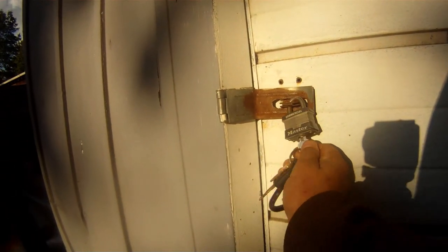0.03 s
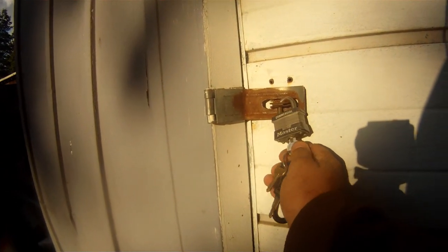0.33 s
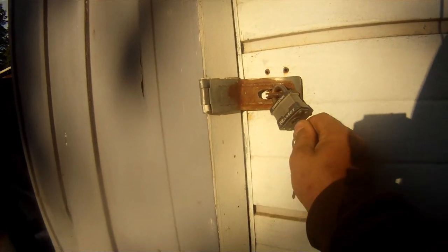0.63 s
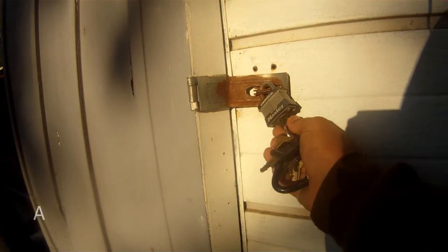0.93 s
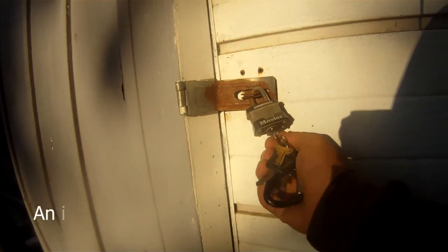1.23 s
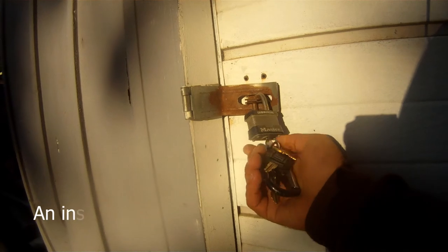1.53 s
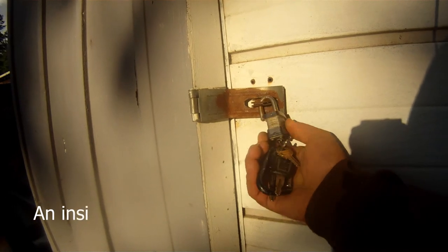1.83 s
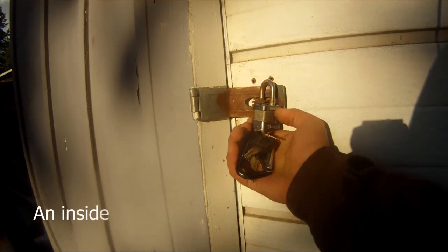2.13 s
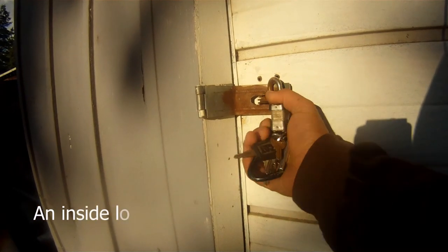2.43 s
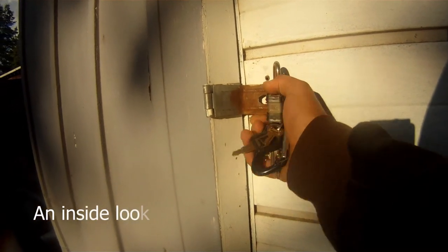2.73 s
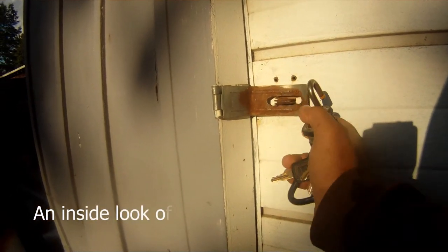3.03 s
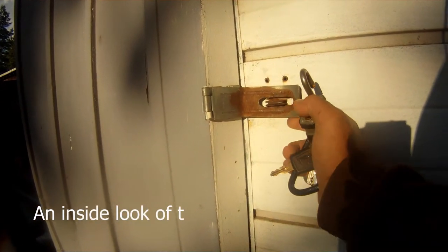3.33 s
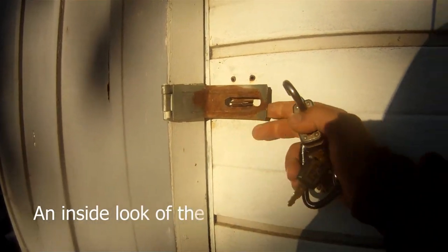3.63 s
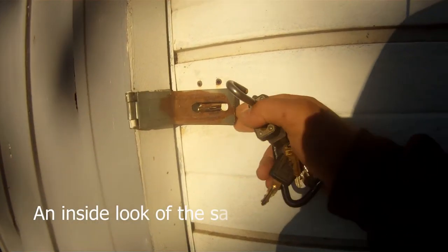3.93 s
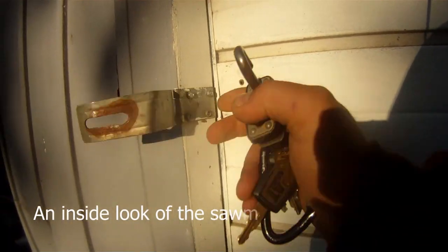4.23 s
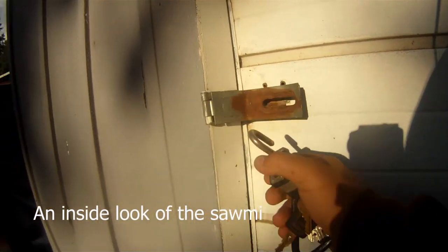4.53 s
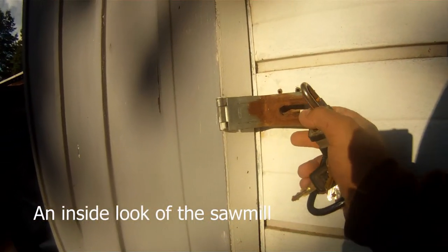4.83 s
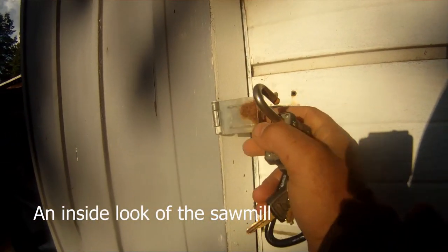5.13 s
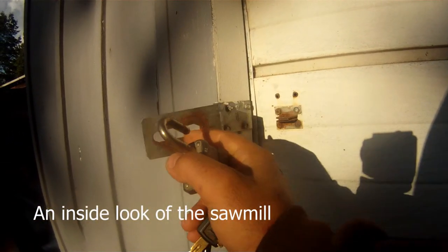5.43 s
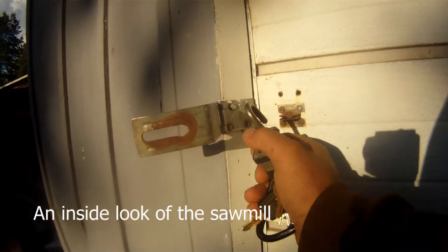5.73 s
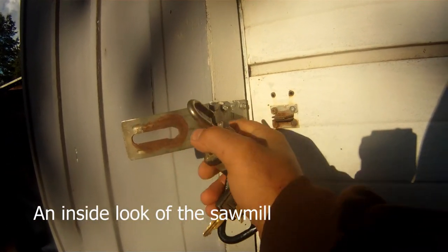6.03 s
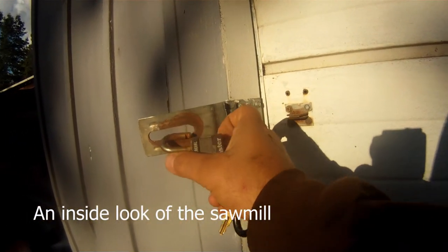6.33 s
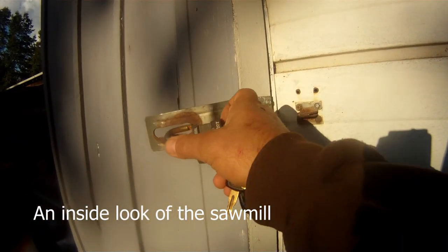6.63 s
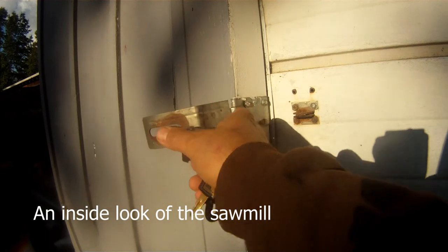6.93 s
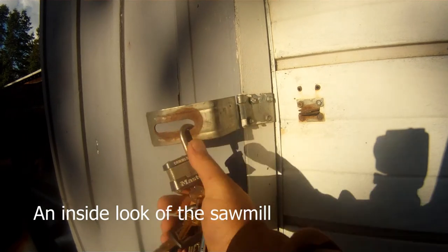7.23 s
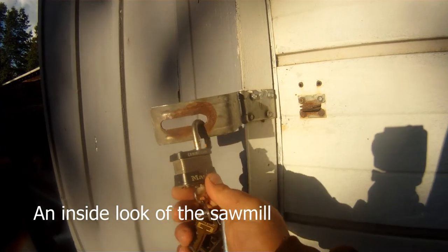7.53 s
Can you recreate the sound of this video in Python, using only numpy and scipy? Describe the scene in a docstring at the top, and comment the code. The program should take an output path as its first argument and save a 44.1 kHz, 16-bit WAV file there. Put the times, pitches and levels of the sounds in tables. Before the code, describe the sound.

Close by, outdoors, keys click lightly as a padlock is tugged and bumped on a shed door, each knock leaving a hollow thud and a metallic ring. Steel scrapes as the lock comes off. The hasp then bangs loudly, squeaks once and bangs again, before the lock's loop clinks softly against it. A faint low rumble from the handheld, nearly mono microphone runs underneath.

```python
"""Over a faint low rumble, a padlock knocks on a hollow shed door. Keys tick, the lock is opened and
lifted off, and its hasp (the hinged steel flap) swings open, shut with one squeak, and open again.
Each knock thuds in the door: its force sets the long boom after it, its hardness the sharp crack
and the wash of ringing metal. Sliding steel scrapes, and near the end the lock's loop clinks.
The shaken door also rumbles in the housing of a camera that hears almost in mono."""
import sys
import numpy as np
from scipy import signal
from scipy.fft import rfft, irfft
from scipy.io import wavfile
from scipy.ndimage import uniform_filter1d

SR = 44100
rng = np.random.default_rng(int(sys.argv[2]) if len(sys.argv) > 2 else 0)


def materialize(psi):
    """Save the field psi as 16-bit PCM at rate SR to the path in sys.argv[1].

    A 1-D psi becomes a single channel; in a 2-D psi each row is a channel.
    """
    bounded = np.clip(np.atleast_2d(psi).T, -1, 1)
    quanta = np.round(bounded * 32767).astype(np.int16)
    wavfile.write(sys.argv[1], SR, quanta)


N = 338247
TIME, FREQS = np.arange(N) / SR, np.fft.rfftfreq(N, 1 / SR)

# Levels are relative. A ring time (t60) is how long a sound takes to fade by 60 dB.
# a hand holding the camera: (time [s], level [dB])
HANDLING = [(0.0, -43.5), (0.38, -44), (2.14, -43.5), (2.58, -38.5), (3.35, -47.5), (3.84, -31.5),
            (4.12, -38), (4.87, -36), (5.94, -46), (7.67, -45)]
# lock and hasp hit the door; hardness is how strong the crack is next to the thud:
# (time [s], thud pitch [Hz], force [dB], hardness [dB])
DOOR_KNOCKS = [(0.166, 398, -13, -18), (0.207, 460, -12, -17), (0.637, 440, -22.5, -18),
               (0.655, 171, -25, -30), (0.849, 365, -19, -14), (0.92, 403, -23.5, -10),
               (1.15, 438, -16, -17.5), (1.332, 415, -12.5, -0.5), (1.359, 370, -12, -24),
               (1.411, 199, -39, -28), (2.2921, 398, -4.5, -2.5), (2.4587, 296, -8, -16.5),
               (2.739, 350, -14.5, -19.5), (2.834, 340, -16.5, -35), (3.33, 330, -31, -22),
               (3.505, 430, -13, -16.5), (3.547, 443, -18.5, -16), (3.638, 385, -7.5, -6),
               (3.732, 154, -23.5, -6), (3.806, 191, -16, -25), (4.262, 432, -21, -14.5),
               (4.312, 435, -14.5, -13), (4.329, 335, 2, -16), (4.364, 390, -8.5, -12),
               (4.376, 175, -20, -11), (4.426, 272, -7.5, -10.5), (4.454, 432, 1, 0), (4.709, 430, 1, -8),
               (4.717, 368, -12.5, -4), (4.846, 282, -15.5, -32), (4.9, 474, -17.5, -18),
               (5.065, 543, -22, -38), (5.549, 473, -39, -16), (6.631, 305, -25.5, -11),
               (6.795, 474, -30.5, -18), (7.06, 352, -26, -16), (7.075, 350, -24, -44),
               (7.183, 376, -29.5, -17), (7.266, 330, -27, -22), (7.443, 430, -30.5, -12),
               (7.549, 300, -32.5, -31)]
# the hand tugs the lock, and the door swells up with no thud: (time [s], force [dB], hardness [dB])
LOCK_TUGS = [(1.135, -23, -22), (1.298, -8, -24), (1.63, -17.5, -14.5), (1.885, -21.5, -8),
             (2.045, -22, -20.5), (2.23, -21.5, -0.5), (2.706, -14.5, -11), (3.03, -24.5, -17.5),
             (3.203, -23, -11.5), (4.79, -10.5, -11.5), (6.715, -23.5, -40), (6.96, -23.5, -26)]
# steel slides on steel: (start [s], end [s], level [dB])
SHACKLE_SCRAPES = [(.2, 0.241, -36), (0.26, .31, -40.5), (1.326, 1.381, -30), (1.36, 1.428, -31),
                   (2.24, 2.30, -44), (2.722, 2.787, -36.5), (4.372, 4.454, -34.5)]  # the shackle is the lock's steel loop
HINGE_RUBS = [(4.378, 4.435, -33.5), (4.66, 4.71, -31.5), (5.06, 5.13, -47), (7.255, 7.31, -47),
              (7.54, 7.62, -62)]
# keys and lock parts tick: (time [s], level [dB], strongest pitch [Hz])
KEY_TICKS = [(0.848, -25, 2900), (0.947, -22.5, 5250), (1.076, -21, 4340), (1.721, -34, 4700),
             (1.779, -32.5, 5800), (1.889, -20.5, 3600), (1.9006, -46, 6000), (1.961, -34, 5200),
             (2.054, -39, 3440), (2.128, -33, 4970), (7.185, -27, 4700), (7.194, -28, 5000)]
# the hinge squeaks as the hasp shuts: (time [s], pitch [Hz], level [dB])
SQUEAK_PATH = [(4.645, 1240, -58), (4.67, 1225, -42), (4.688, 1215, -32), (4.703, 1230, -33),
               (4.711, 1180, -24)]
# the squeak's tones at 1, 2, 3 and 4 times its pitch: (level [dB])
SQUEAK_HARMONICS = [2, 1, -5, -9]
# the shackle clinks on the open hasp: (time [s], level [dB], ring time [s])
SHACKLE_CLINKS = [(6.4725, -35, 0.31), (6.473, -30.5, 0.085), (7.181, -46.5, 0.37), (7.371, -36, 0.19)]

# modes, the tones a thing rings at when struck: (pitch [Hz], level [dB], ring time [s])
DOOR_TONES = [(147.3, 5.5, 0.4), (347, -11, 0.66), (347, -9.5, 0.063), (464.3, -10, 0.13),
              (487, -3.5, 0.18), (576, -30, 0.08)]
SHACKLE_TONES = [(1591, -10, 0.034), (2720, -2.5, 0.032), (4700, -18, 0.14), (5420, 4.5, 0.014)]
# modes of the steel hasp: (pitch [Hz], width [Hz], boost [dB])
HASP_TONES = [(1190, 110, -1), (1540, 47, 3.5), (2110, 220, 3), (2230, 4.3, -11), (2700, 100, 8),
              (2925, 180, 8.5), (3245, 8.4, 11.5), (3797, 81, 7.5), (4450, 26, 3), (4800, 90, 6.5),
              (5500, 41, -6), (5510, 130, 4.5)]
# modes of the padlock and keys: (pitch [Hz], level [dB], ring time [times that of a tick])
LOCK_TONES = [(2360, 3, 0.87), (2890, 9, 0.63), (3500, -45, 0.24), (4730, -0.5, 1.45), (5260, -33, 0.25),
              (5220, 18, 0.13), (6300, -21, 0.64), (6960, 8, 0.66), (7700, -31, .9), (9082, -33, 1.3),
              (14800, -19, .8)]

# colours, how strong each noise is from low to high: (frequency [Hz], level [dB])
DRUM_COLOUR = [(75, -22), (105, -6.5), (135, -2.5), (160, -5.5), (200, -14), (330, -18.5), (500, -34.5)]  # the hollow door
RUMBLE_COLOUR = [(20, -19), (32, -5), (41, 2.5), (52, 2), (80, 4), (110, -6), (170, -28.5)]  # the camera housing
AIR_COLOUR = [(100, 19), (250, 1), (480, 6), (650, -1), (850, -10), (1200, -13), (2800, -11), (3600, -17.5),
              (5000, -16.5), (5700, -23)]  # outdoor air
CRACK_COLOUR = [(250, -39), (500, -3), (900, 0.5), (1600, 4.5), (2200, -1), (2900, 0.5), (3800, 2),
                (4500, -6.5), (5500, 2.5)]  # steel hitting steel
BOOM_COLOUR = [(50, -34), (90, -5.5), (170, -2), (240, -3), (300, -1.5), (345, 0), (400, 0), (480, 1.5),
               (630, 0), (720, -13), (880, -20.5), (1050, -29)]  # door and shed ringing on
WASH_COLOUR = [(650, -38), (860, 3), (1200, 0), (1400, 0), (1650, 0.5), (2350, -4.5), (2700, -1),
               (2950, -1), (3350, -5), (4100, -7.5), (4800, -5.5), (5600, -7.5)]  # metal ringing on
CLINK_COLOUR = [(150, 1), (500, 0), (1000, -9), (1500, -5), (2100, -5.5), (2750, -3), (3000, 0.5),
                (3450, -14), (4156, -8), (5000, -13), (5700, -17)]  # the bouncing shackle
SCRAPE_COLOUR = [(700, -14), (1100, -21), (1900, -5), (2400, -2.5), (2950, 0), (3400, -7),
                 (4100, -1.5), (4800, -2), (5600, -3.5)]
KEY_COLOUR = [(1500, -9), (2400, 4), (5500, -9), (7200, -7.5), (9500, -6), (11000, -19), (15000, -18)]
HINGE_COLOUR = [(600, -12), (900, 5), (1300, 0), (1700, -8), (2100, -4), (2550, -17), (3200, -17),
                (5000, -33)]


def amp(db):
    """Turns decibels into a number to multiply by."""
    return 10 ** (np.asarray(db) / 20)


def unit(x):
    """Scales a signal to an average size (rms) of 1."""
    return x / np.sqrt(np.mean(x ** 2) + 1e-20)


def add(mix, s, sound):
    """Mixes a sound in at s seconds."""
    part = mix[round(s * SR):][:len(sound)]
    part += sound[:len(part)]


def noise(colour):
    """Steady noise in a given colour, falling away past both ends of its table."""
    hz, db = np.transpose(colour)
    gain = amp(np.interp(np.log(FREQS + 1), np.log(hz), db))
    edges = (1 + (FREQS / hz[-1] / 2) ** 8) * (1 + (hz[0] / 2 / (FREQS + 1)) ** 4)
    return unit(irfft(rfft(rng.standard_normal(N)) * gain / edges, N))


def steel(colour):
    """Noise that rings in the hasp: its main tones and many small ones in between."""
    peaks_db = sum(db / (1 + (2 * (FREQS - hz) / width) ** 2) for hz, width, db in HASP_TONES)
    grid_hz = np.arange(0, SR, 25)
    ripple_db = 2.2 * np.interp(FREQS, grid_hz, rng.standard_normal(len(grid_hz)))
    return unit(irfft(rfft(noise(colour)) * amp(peaks_db + ripple_db), N))


def fades(starts, dbs, rise, t60):
    """Loudness curve of overlapping blows: each swells and dies away, and their powers add up."""
    t, power = np.arange(round(1.5 * SR)) / SR, np.zeros(N)
    for s, db, attack, life in np.broadcast(starts, dbs, rise, t60):
        swell = 1 - np.exp(-np.minimum(t / attack, 20))
        decay = np.exp(-np.minimum(np.log(1000) * t / life, 20))
        add(power, s, (amp(db) * swell * decay) ** 2)
    return np.sqrt(power)


def contacts(tug_hz=310, tug_swell_s=0.016, limit_db=-19.5, choke_from_db=-2.5):
    """Lists every knock and tug: time, pitch, extra swell time, boom level and wash level."""
    knocks = [(*knock, 0) for knock in DOOR_KNOCKS]
    tugs = [(s, tug_hz, force, hardness, tug_swell_s) for s, force, hardness in LOCK_TUGS]
    s, hz, force_db, hardness_db, swell = np.transpose(knocks + tugs)
    choke_db = 2.7 * np.maximum(force_db - choke_from_db, 0)  # the strongest blows pin the door
    boom_db = np.minimum(force_db - 11, limit_db) - choke_db
    wash_db = boom_db - 7 + 0.66 * hardness_db
    return s, hz, swell, boom_db, wash_db


def drum_and_rumble():
    """Each contact drums in the hollow door and rumbles in the camera, over steady handling noise."""
    s, _, _, boom_db, _ = contacts()
    hand_db = np.interp(TIME, *np.transpose(HANDLING))
    drum = np.hypot(amp(hand_db + 0.5), fades(s, boom_db - 4, rise=0.0067, t60=1))
    rumble = np.hypot(amp(hand_db + 3), fades(s, boom_db - 19, rise=0.04, t60=0.39))
    return noise(DRUM_COLOUR) * drum + noise(RUMBLE_COLOUR) * rumble


def air():
    """Outdoor air makes a quiet, even hush."""
    return amp(-47.5) * noise(AIR_COLOUR)


def cracks(softening=0.2):
    """Steel meets steel in a short, bright burst; light touches are drawn out."""
    s, _, force_db, hardness_db = np.transpose(DOOR_KNOCKS)
    crack_db = force_db + hardness_db
    stretch = amp(crack_db + 14.5) ** -softening
    return amp(1.5) * steel(CRACK_COLOUR) * fades(s, crack_db, rise=0.0029 * stretch, t60=.024 * stretch)


def shackle_ring(lock_off_s=4.0):
    """While the lock still hangs on the door, knocks ring its shackle."""
    t, out = np.arange(SR // 5) / SR, np.zeros(N)
    hz, db, t60 = np.transpose(SHACKLE_TONES)[:, :, None]
    tones = amp(db - 60 * t / t60) * np.sin(2 * np.pi * hz * t)
    ring = tones.sum(0) * (1 - np.exp(-t / 0.0021))
    for s, _, force_db, hardness_db in DOOR_KNOCKS:
        if s < lock_off_s:
            add(out, s, amp(force_db + hardness_db - 3) * ring)
    return out


def thuds():
    """The door flexes once or twice under each knock; stronger blows are shorter."""
    t, out = np.arange(SR // 20) / SR, np.zeros(N)
    for s, hz, force_db, hardness_db in DOOR_KNOCKS:
        swell_s = .0017 * amp(force_db + 10) ** -.15 * np.sqrt(400 / hz)
        pulse = t / swell_s * np.exp(1 - t / swell_s)
        lag_s = 0.00185 * amp(hardness_db)  # the door answers after the steel, sooner if hit softly
        add(out, s + lag_s, amp(force_db) * pulse * np.sin(2 * np.pi * hz * t))
    return amp(1.5) * out


def door_ring(reach_octaves=0.2):
    """A knock wakes the door's tones that lie near its own pitch."""
    t, out = np.arange(round(.7 * SR)) / SR, np.zeros(N)
    hz, db, t60 = np.transpose(DOOR_TONES)[:, :, None]
    tones = amp(db - 60 * t / t60) * np.sin(2 * np.pi * hz * t) * (1 - np.exp(-t / 0.0027))
    for s, pitch_hz, force_db, _ in DOOR_KNOCKS:
        nearness = np.exp(-.5 * (np.log2(hz / pitch_hz) / reach_octaves) ** 2)
        level_db = min(force_db, -12) + 2.5  # the hand chokes strong blows
        add(out, s, amp(level_db) * (nearness * tones).sum(0))
    return out


def boom_and_wash(lean_db_per_octave=7):
    """Door and shed ring on in a boom and a metallic wash; the high part of each dies sooner."""
    s, hz, swell, boom_db, wash_db = contacts()
    boom, wash = noise(BOOM_COLOUR), steel(WASH_COLOUR)
    low_boom = irfft(rfft(boom) / (1 + (FREQS / 520) ** 8), N)
    low_wash = irfft(rfft(wash) / (1 + (FREQS / 3400) ** 6), N)
    lean_db = lean_db_per_octave * np.log2(hz / 400)  # a higher thud leaves a higher boom
    return (low_boom * fades(s, boom_db, rise=0.00076 + swell, t60=1.297)
            + amp(2) * (boom - low_boom) * fades(s, boom_db + lean_db, rise=0.0012 + swell, t60=0.76)
            + amp(0.5) * low_wash * fades(s, wash_db, rise=0.00067 + swell, t60=0.83)
            + amp(6.5) * (wash - low_wash) * fades(s, wash_db, rise=0.0029 + swell, t60=0.41))


def sliding(strokes, colour, slips_per_s, slip_t60):
    """Sliding steel catches and slips many times, each slip ringing the hasp for a moment."""
    pressure = np.zeros(N)
    for start, end, db in strokes:
        add(pressure, start, amp(db) * signal.windows.tukey(round((end - start) * SR), .4))
    slips = amp(5.7 * rng.standard_normal(N)) * (rng.random(N) < slips_per_s / SR)
    fading_slips = signal.lfilter([1], [1, -np.exp(-np.log(1000) / slip_t60 / SR)], slips)
    return unit(steel(colour) * fading_slips) * pressure


def shackle_scrapes():
    """The shackle grates brightly in the steel eye it hangs from."""
    return sliding(SHACKLE_SCRAPES, SCRAPE_COLOUR, slips_per_s=290, slip_t60=0.075)


def keys(reach_octaves=0.52, scatter_db=3, tick_t60=0.035):
    """Each tick rings a different mix of the lock's tones, with a short scrape and a faint jingle."""
    t, out = np.arange(SR // 5) / SR, np.zeros(N)
    hz, db, life = np.transpose(LOCK_TONES)[:, :, None]
    grit = noise(KEY_COLOUR)
    for s, level_db, centre_hz in KEY_TICKS:
        strength, detune, phase = rng.standard_normal((3, len(hz), 1))
        nearness = np.exp(-.5 * (np.log2(hz / centre_hz) / reach_octaves) ** 2)
        weight = amp(db + scatter_db * strength) * nearness
        waves = np.sin(2 * np.pi * (hz * (1 + 0.0274 * detune) * t + phase))
        tones = weight * amp(-60 * t / (tick_t60 * life)) * waves
        scrape = .22 * grit[round(s * SR):][:len(t)] * amp(-60 * t / tick_t60)
        tick = tones.sum(0) / np.linalg.norm(weight) + scrape
        add(out, s, amp(level_db) * tick * (1 - np.exp(-t / 0.00044)))
    s, level_db, _ = np.transpose(KEY_TICKS)
    jingle = amp(-29) * grit * fades(s, level_db, rise=0.0022, t60=0.59)
    return out + jingle


def hinge_rubs():
    """The dry hinge rubs as the hasp turns, lower and finer than the shackle's scrape."""
    return sliding(HINGE_RUBS, HINGE_COLOUR, slips_per_s=750, slip_t60=0.063)


def hinge_squeak(jitter=0.008, roughness=0.5):
    """The hinge pin sticks and slips at a wavering rate and with uneven force."""
    s, hz, db = np.transpose(SQUEAK_PATH)
    waver, force = (unit(uniform_filter1d(uniform_filter1d(hiss, size=130), size=130))
                    for hiss in rng.standard_normal((2, N)))
    cycles = np.cumsum(np.interp(TIME, s, hz) * (1 + jitter * waver)) / SR
    tone = sum(amp(level) * np.sin(2 * np.pi * k * cycles) for k, level in enumerate(SQUEAK_HARMONICS, 1))
    loudness = amp(np.interp(TIME, s, db, left=-150, right=-150))
    return unit(tone * (1 + roughness * force)) * loudness


def clinks(chatter_db=3):
    """The shackle bounces unevenly on the loose hasp."""
    s, db, t60 = np.transpose(SHACKLE_CLINKS)
    bounces = amp(chatter_db * unit(uniform_filter1d(rng.standard_normal(N), size=180)))
    return unit(steel(CLINK_COLOUR) * bounces) * fades(s, db, rise=0.00046, t60=t60)


def fizzy(x, hold_hz=12000):
    """Holding the wave in small steps mirrors it into the treble: a thin fizz that follows the sound."""
    steps = np.repeat(signal.resample_poly(x, hold_hz, SR, window=("kaiser", 7)), 4)
    return signal.resample_poly(steps, SR, 4 * hold_hz)


def scene(muffle_hz=5650, direct_db=-17, side_db=-15, echo_s=0.0021):
    """The door sounds from the middle; only the bright parts spread a little."""
    metal = cracks() + shackle_ring() + shackle_scrapes() + hinge_rubs() + clinks()
    door = thuds() + door_ring() + boom_and_wash() + metal + drum_and_rumble() + air()
    muffled = signal.oaconvolve(door, signal.firwin(201, muffle_hz, fs=SR), "same")
    direct = amp(direct_db) * metal + hinge_squeak() + keys()  # steel heard straight through the air
    mid = fizzy(muffled) + direct
    reflection = np.exp(-2j * np.pi * FREQS * echo_s) - .35  # a short echo, leaning right
    treble = (FREQS / (FREQS + 900)) ** 2
    side = amp(side_db) * irfft(rfft(mid) * reflection * treble, N)
    return np.array([mid + side, mid - side])


def record(dry, drive=0.98, top_hz=15350):
    """The strongest knocks overload the input; then the highest treble is cut away."""
    clipped = drive * dry / (1 + (drive * dry) ** 8) ** (1 / 8)
    lowpass = signal.firwin(401, top_hz, window=("kaiser", 7), fs=SR)
    return signal.oaconvolve(clipped, lowpass[None], "same")


dry = scene()
out = record(dry)
materialize(out)
```